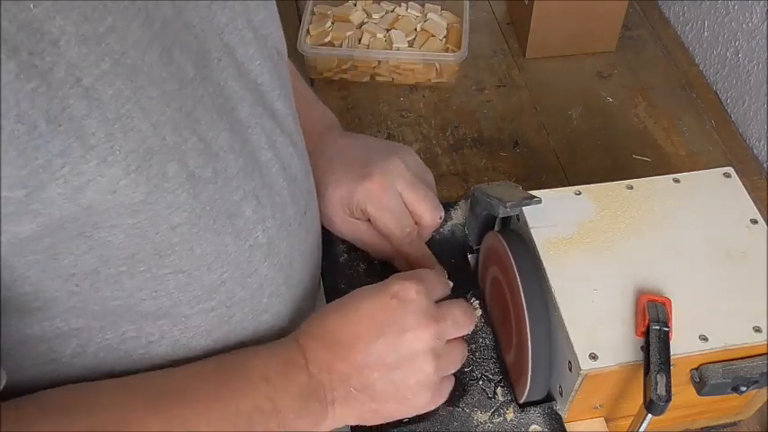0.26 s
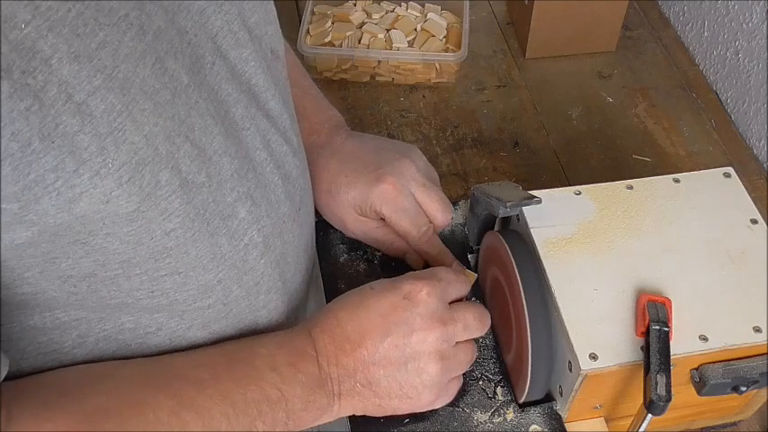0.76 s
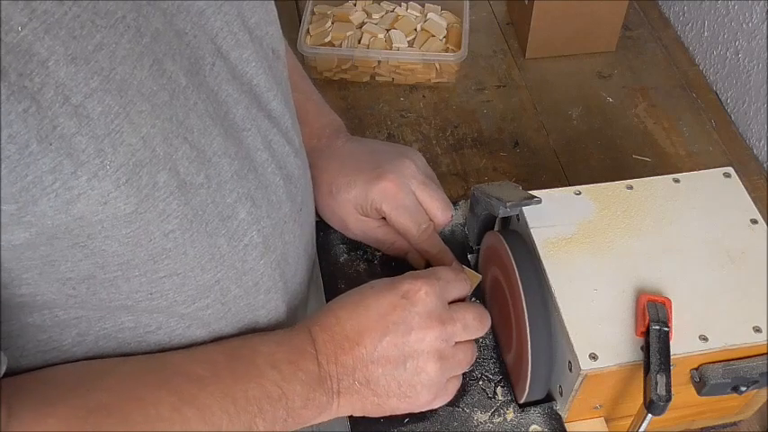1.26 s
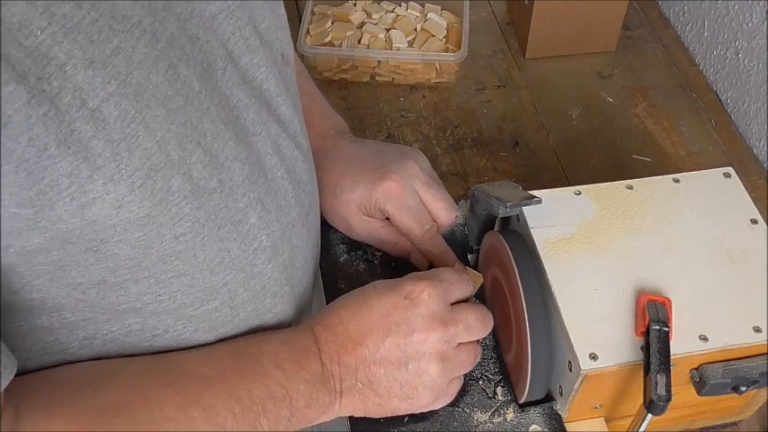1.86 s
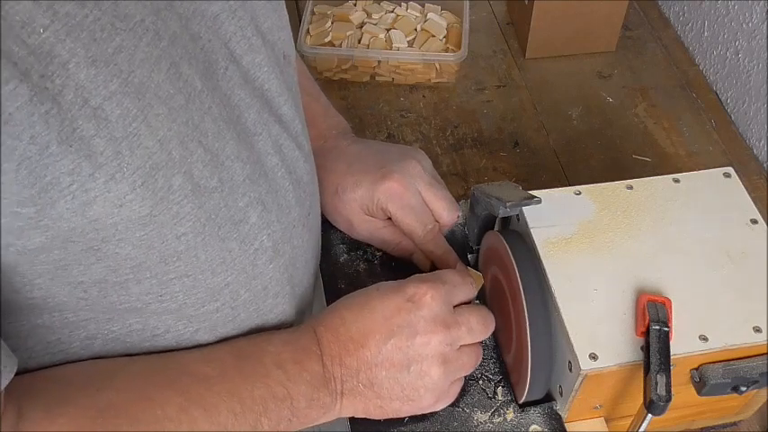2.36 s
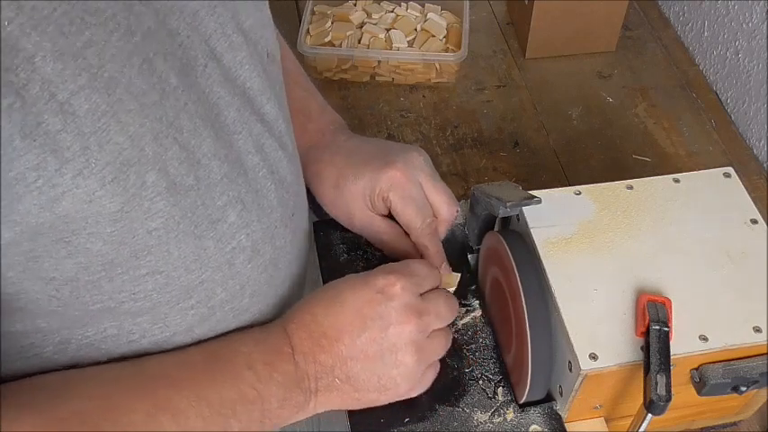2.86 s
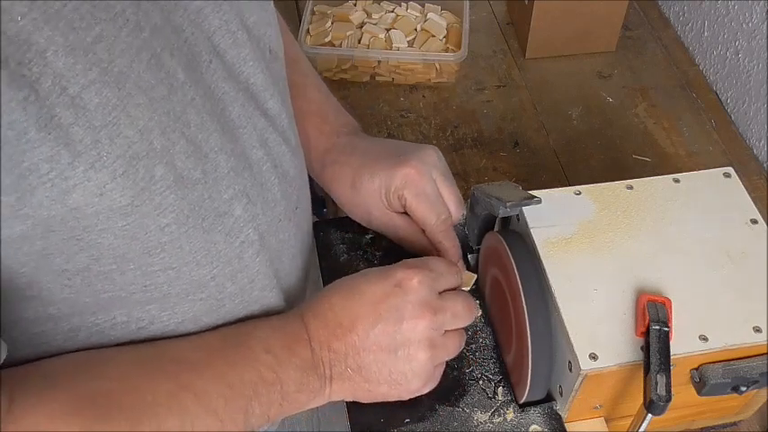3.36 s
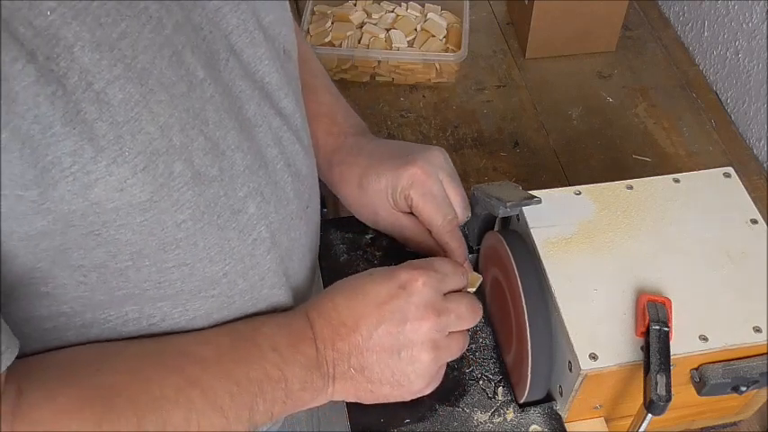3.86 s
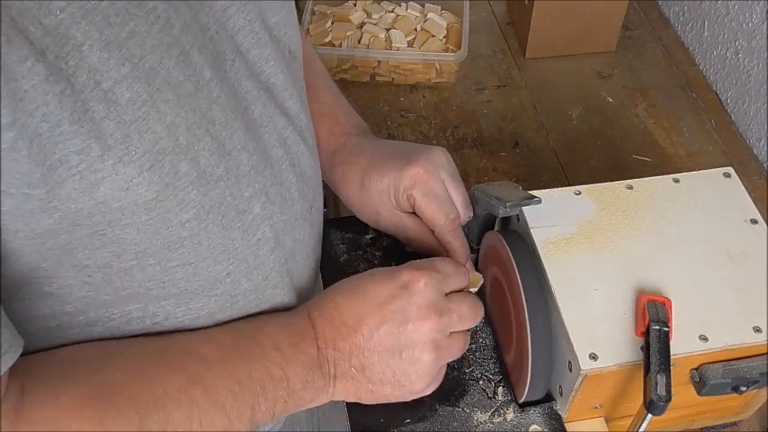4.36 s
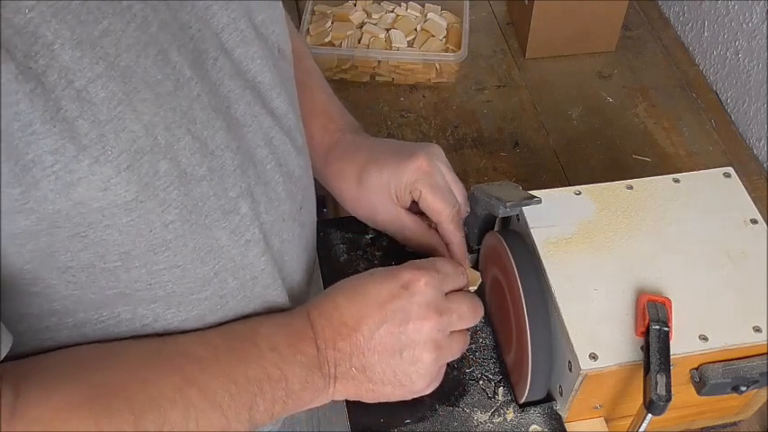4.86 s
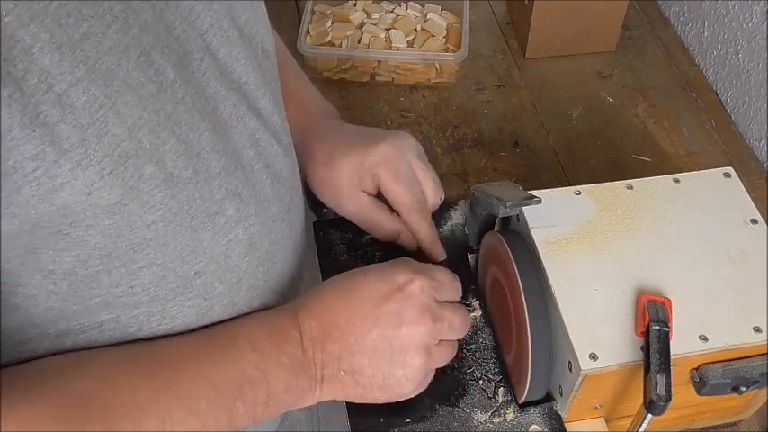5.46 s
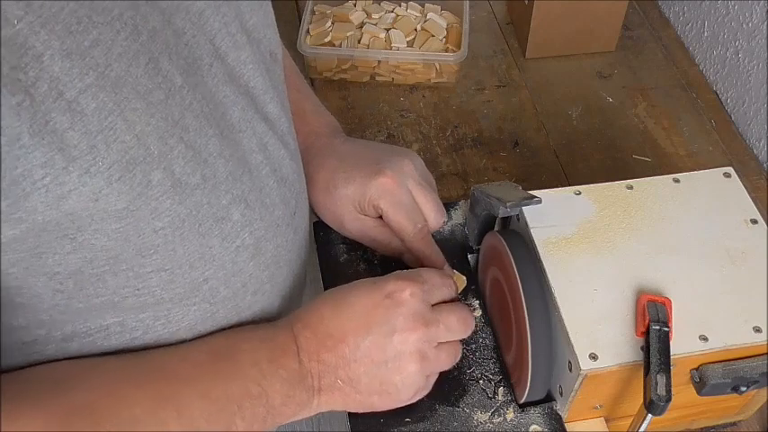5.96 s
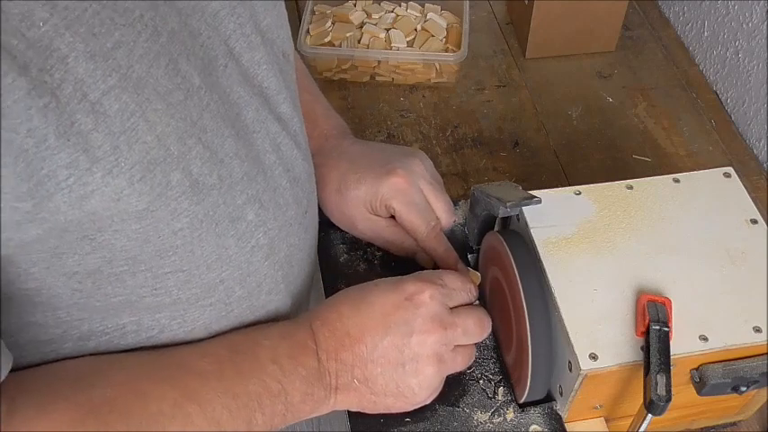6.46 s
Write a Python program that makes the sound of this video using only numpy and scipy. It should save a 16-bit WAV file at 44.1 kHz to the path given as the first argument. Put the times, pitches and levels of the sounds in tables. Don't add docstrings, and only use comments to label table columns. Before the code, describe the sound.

A small disc sander drones steadily on a bench while two small wooden pieces are pressed on in turn, each giving a harsh buzzing rasp.

```python
import sys
import numpy as np
from scipy import signal
from scipy.fft import rfft, irfft, next_fast_len
from scipy.io import wavfile
from scipy.ndimage import uniform_filter1d

SR = 44100
rng = np.random.default_rng(int(sys.argv[2]) if len(sys.argv) > 2 else 0)


def dump_mix(stems):
    frames = np.atleast_2d(stems).T
    limited = np.clip(frames, -1, 1)
    pcm = np.round(limited * 32767).astype(np.int16)
    wavfile.write(sys.argv[1], SR, pcm)


def makeup_ratio(level_db):
    decades = np.asarray(level_db, float) / 20
    return 10 ** decades


N = 295470

BALLS_PER_TURN = 2.58
SETTLE_S = 0.083

# (touch [s], firm after [s], ease-off [s], lift [s])
PIECES = [
    (1.325, .13, 2.55, 2.672),
    (3.785, .09, 4.83, 4.98),
]
# (level after gain control [dB], top-band lift at the touch [dB],
# creep of that lift as the edge wears [dB], gain control depth [dB])
BITES = [
    (-31.5, 14, 4, -49.5),
    (-30.5, 6, -10, -50.5),
]


def evened(x):
    return x / np.sqrt(np.mean(x ** 2) + 1e-20)


def coloured(x, points):
    size = next_fast_len(x.shape[-1])
    hz, db = np.transpose(points)
    log_hz = np.log(np.fft.rfftfreq(size, 1 / SR) + 1)
    response = makeup_ratio(np.interp(log_hz, np.log(hz + 1), db))
    return irfft(rfft(x, size) * response, size)[..., :x.shape[-1]]


def drift(per_s):
    points = rng.standard_normal(400)
    return np.interp(np.arange(N) / SR * per_s, np.arange(400), points) * 1.156


def ring(hz, t60):
    t = np.arange(1500) / SR
    mode = makeup_ratio(-60 * t / t60) * np.sin(2 * np.pi * hz * t)
    return mode / np.linalg.norm(mode)


def resonate(x, hz, width):
    spin = np.exp(2j * np.pi * np.cumsum(hz * np.ones(N)) / SR)
    r = np.exp(-np.pi * width / SR)
    return 2 * (spin * signal.lfilter([1 - r], [1, -r], x / spin)).real


def stages(piece, values):
    touch, firm, ease, lift = PIECES[piece]
    catch = touch + 0.54 * firm
    times = [touch, catch, touch + firm, touch + firm + SETTLE_S, ease, (ease + lift) / 2, lift]
    return np.interp(np.arange(N) / SR, times, values)


def disc_speed():
    free_turns_per_s, spin_up_s, let_go_s = 58.72, .4523, .2956
    # (start [s], at first [turns per s2], at the hardest [turns per s2], free again [s])
    braking = [
        (1.33, 2.055, 29.38, 2.6957),
        (3.79, 5.3525, 27.905, 5.094),
    ]
    t = np.arange(N) / SR
    drag = np.zeros(N)
    for start, first, top, end in braking:
        drag += np.interp(t, [start, end - let_go_s, end], [first, top, 0], left=0)
    return free_turns_per_s - signal.lfilter([1 / SR], [1, -np.exp(-1 / (SR * spin_up_s))], drag)


def room(x, t60=0.33, apart_hz=3500):
    taps = np.zeros((3, 9000))
    at = np.arange(60, 8980, 20) + rng.integers(0, 20, (3, 446))
    np.put_along_axis(taps, at, rng.choice([-1., 1.], at.shape), 1)
    taps *= makeup_ratio(-60 * np.arange(9000) / SR / t60)
    low = signal.butter(1, apart_hz, fs=SR, output="sos")
    taps = taps[:2] + signal.sosfilt(low, taps[2] - 0.46 * taps[:2])
    return signal.oaconvolve(x, taps / np.linalg.norm(taps[0]), axes=1)[:, :N]


def panels():
    out = np.zeros(N)
    for hz, db in [(265, -45), (430, -46), (503, -46), (600, -51)]:
        band = signal.butter(1, [hz - 6, hz + 6], "band", fs=SR, output="sos")
        out += makeup_ratio(db) * evened(signal.sosfilt(band, rng.standard_normal(N)))
    return out


def strain(speed):
    colour = [(30, -30), (70, -12), (110, -19), (160, 11), (220, 2), (400, -47)]
    grumble = coloured(rng.standard_normal(N), colour)
    return makeup_ratio(-65.0) * (speed.max() - speed) * evened(grumble)


def drone(turn):
    # (frequency [Hz], level [dB per Hz])
    box_colour = [(40, -38), (90, -24), (200, -17), (270, -4), (420, -10), (600, 0.5), (750, -9.5),
                  (980, -9), (1200, -13), (1400, -22.5), (1700, -40), (2300, -16.5), (3000, -101),
                  (6000, -80)]
    ball_knocks, angle = np.zeros(N), np.arange(257) / 256
    for balls in range(1, 16):
        sides = rng.standard_normal((13, 2)) @ [1, 1j]
        pattern = sides @ np.exp(2j * np.pi * np.arange(-6, 7)[:, None] * angle)
        strength = np.interp(turn % 1, angle, pattern)
        ball_knocks += (strength * np.exp(2j * np.pi * balls * BALLS_PER_TURN * turn)).real
    ball_knocks = evened(coloured(ball_knocks, box_colour))
    common, apart = rng.standard_normal(N), rng.standard_normal((2, N))
    rumble = evened(coloured(common + 0.79 * apart, box_colour))
    return makeup_ratio(-34.0) * ball_knocks + makeup_ratio(-33.0) * rumble * makeup_ratio(0.87 * drift(60.0))


def box_db(hz):
    # (frequency [Hz], width [Hz], lift [dB])
    modes = [(362, 14, 7), (505, 16, 14), (607, 16, 11), (993, 16, 6)]
    return sum(db / (1 + (2 * (hz - f) / width) ** 2) for f, width, db in modes)


def tones(speed, turn):
    # (multiple of the ball rate [-], multiple of
    # the turn [-], level [dB])
    tone_mixes = [(0, 1, -39), (0, 2, -42), (0, 3, -50), (1, 0, -48), (1, 2, -49), (2, 0, -46), (0, 6, -42),
                  (2, 1, -37), (1, 4, -48), (0, 7, -47), (2, 2, -46), (4, -3, -44), (3, 0, -48), (0, 8, -45),
                  (2, 3, -47), (1, 6, -46), (3, 1, -40), (0, 9, -45), (2, 4, -46), (0, 10, -46), (2, 5, -41),
                  (4, 0, -40), (4, 1, -46), (4, 3, -47), (6, 0, -46), (6, 1, -46), (5, 4, -44), (5, 6, -49),
                  (7, 3, -51), (0, 20, -50),
                  (0, 26, -61), (0, 30, -63), (0, 31, -60), (0, 32, -63), (0, 33, -66), (0, 35, -66)]
    out, coarse = np.zeros((2, N)), np.arange(0, N, 200)
    sag = speed.max() - speed[coarse]
    for balls, turns, db in tone_mixes:
        order = balls * BALLS_PER_TURN + turns
        lift_db = box_db(order * speed[coarse]) - box_db(order * speed.max())
        lift_db -= (1.1 if order > 3 else .3) * sag
        waver_db = 1.85 * drift(9.0)[coarse] * (order > 2)
        size = np.interp(np.arange(N), coarse, makeup_ratio(db + 4.0 + lift_db + waver_db))
        wave = size * np.exp(2j * np.pi * (order * turn + rng.random()))
        skew = (0.022 + 0.017 * order) * (rng.standard_normal(2) @ [1, 1j])
        skew = -.12 + .05j if order < 3 else skew
        out += (np.array([[1 + skew], [1 - skew]]) * wave).real
    return out


def ticks(turn):
    # (frequency [Hz], t60 [s], level [dB])
    housing = [(2348, 0.031, -43), (5360, 0.0034, -45.5), (7990, 0.0022, -42.5), (9470, 0.0036, -51),
               (10650, 0.00062, -48.5)]
    # (frequency [Hz], level [dB per Hz])
    whirr = [(880, -14), (1500, -6.5), (1980, -25), (2340, -3), (2820, -13), (4260, -11.5), (5390, -10),
             (6560, -13), (8070, -13.5), (13100, -27), (15800, -35)]
    passes = np.diff(np.floor(turn * BALLS_PER_TURN), prepend=0) > 0
    stray = rng.random(N) < 250.0 / SR
    uneven = makeup_ratio(3.9 * np.minimum(rng.exponential(1, N), 2.5))
    force = (passes + 0.61 * stray) * uneven
    scuff = signal.oaconvolve(force, makeup_ratio(-60 * np.arange(400) / SR / 0.01))[:N]
    out = np.zeros((2, N))
    for hz, t60, db in housing:
        common, apart = rng.standard_normal(N), rng.standard_normal((2, N))
        drive = scuff * (common + hz / 9100.0 * apart)
        out += makeup_ratio(db) * evened(signal.oaconvolve(drive, ring(hz, t60)[None], axes=1)[:, :N])
    air = rng.standard_normal(N) + 0.35 * rng.standard_normal((2, N))
    struck = coloured(out, [(11000, 0), (13000, -2.5), (16000, -13)])
    return struck + makeup_ratio(-42) * evened(coloured(air, whirr))


def knocks():
    # (time [s], peak [dB], share of low knock [dB])
    hits = [
        (0.0572, -9, -7.5),
        (0.286, -17, -25),
        (1.29, -26, 2),
        (3.2064, -44, -16),
        (5.7182, -17.5, -16),
        (5.948, -13.5, -24),
        (6.4165, -13, -10),
    ]
    snap, low_knock, t = np.zeros(N + 900), np.zeros(N + 900), np.arange(900) / SR
    for s, db, low_db in hits:
        tick = makeup_ratio(db - 2 - 60 * t / 0.012) * rng.standard_normal(900)
        snap[round(s * SR):][:900] += tick
        low_knock[round(s * SR):][:900] += tick * makeup_ratio(low_db)
    bright = coloured(snap[:N], [(3500, -23), (6000, -3.5), (10000, -6.5), (16000, -36)])
    return bright + coloured(low_knock[:N], [(600, -20), (1500, 8), (4000, 2.5), (7000, -25)])


def chatter(turn):
    # (multiple of the turn [-], first piece after gain control [dB], second piece [dB])
    multiples = [(14.16, -61.5, -67), (15.9, -63, -77), (17.06, -66.5, -77), (18.33, -63, -64),
                 (21.04, -61, -75), (23, -67, -70), (26, -57, -55), (26.8, -52.5, -55), (27.95, -52, -64),
                 (40, -57, -56), (54.3, -55, -71), (30.25, -54.5, -75)]
    out, t = np.zeros(N), np.arange(N) / SR
    for piece, ((start, *_, end), wear_db) in enumerate(zip(PIECES, [-8, -14])):
        held = np.interp(t, [start + 0.055, start + 0.18, end - .1, end], [0, 1, makeup_ratio(wear_db), 0])
        for order, *db in multiples:
            level = makeup_ratio(db[piece] + 0.5 + 4 * drift(7))
            out += held * level * np.cos(2 * np.pi * (order * turn + rng.random()))
    return out


def grit(turn, count=1000):
    laps, kept, slip = int(turn[-1]) + 3, .945, 3.
    size = makeup_ratio(3.5 * np.minimum(rng.exponential(1, (laps, count)), 3.5))
    fresh = rng.standard_normal((laps, count)) * size
    grains = signal.lfilter([1], [1, -kept], fresh, axis=0)
    ridges = uniform_filter1d(uniform_filter1d(rng.standard_normal((laps, count)), 25, 1), 18, 1)
    ridges = evened(signal.lfilter([1], [1, -kept], ridges, axis=0))
    surface = (grains * makeup_ratio(1.5 * ridges)).ravel()
    return evened(np.interp(turn * count + slip * drift(10), np.arange(surface.size), surface))


def pressure(piece, angle):
    arc_turns = [0.064, 0.137, 0.39, 0.43, 0.51, 0.32, .04]
    middle_turns = [0.011, 0.062, 0.05, -0.048, -0.022, -.01, 0.026]
    edge_catch = [1.9, 2.1, 2.1, 1.9, .4, .4, .4]
    high_spot = [1, 1, 1.2, 1.5, 4, 4, 4]
    middle, arc = stages(piece, middle_turns), np.maximum(stages(piece, arc_turns), .01)
    first, last = middle - arc / 2, middle + arc / 2
    touch = np.clip((angle - first) / 0.011, 0, 1) * np.clip((last - angle) / 0.041 + .5, 0, 1)
    press = 1.7 + np.sin(np.pi * np.clip((angle - first) / (last - first), 0, 1))
    press += stages(piece, high_spot) * np.exp(-abs(angle + .015) / .045)
    edge = stages(piece, edge_catch) * np.exp(-abs(angle - first) / 0.036)
    trail = 0.39 * np.exp(-((angle - last) % 1) / 0.047)
    return (touch * (press + edge) + trail + 0.07) / np.sqrt(last - first)


def sanding(turn):
    # (frequency [Hz], level [dB per Hz])
    colours = [
        [(900, -38), (1500, -14.5), (2400, -20.5), (3300, -12.5), (4000, -11), (4900, -10), (5700, -9),
         (7600, -1), (9000, -6), (11100, -11.5), (12500, -20), (15800, -27)],
        [(900, -38.5), (1500, -26.5), (2400, -24.5), (3000, -28.5), (3500, -16), (4600, -12), (5600, -15.5),
         (7000, -6.5), (8200, -5), (10000, -9), (14500, -16.5), (15800, -23)],
    ]
    # (frequency [Hz], level [dB per Hz])
    rub_colour = [(300, -42), (1000, -28.5), (1600, -18), (2600, -22), (4000, -16), (8000, -14.5),
                  (12000, -25.5), (16000, -40)]
    # (shift [s], from [Hz], to [Hz], strength [dB], table ring after it [dB])
    grips = [
        (2.22, 4340, 4800, 9, 7),
        (4.35, 3500, 4660, -1, 11),
    ]
    stage_db = [-3.5, 1.5, 0.5, -.5, -2, -7.5, -26]
    top_share = [1, 1, -0.54, 0.1, 0.99, -.5, -1]
    shift_s, table_touch_db = 0.07, -29
    common = grit(turn + .5)
    apart = coloured(grit(turn + .5), [(1000, 0), (5000, -31), (9000, -3.0), (15000, -4.0)])
    grains, loose = np.array([common + apart, common - apart]), rng.standard_normal((3, N))
    rub = coloured(0.5 * common + 0.5 * loose[0] + 0.46 * loose[1:], rub_colour)
    angle, t, out = (turn + .5) % 1 - .5, np.arange(N) / SR, np.zeros((2, N))
    for piece, colour in enumerate(colours):
        start, *_, end = PIECES[piece]
        db, lift_db, creep_db, _ = BITES[piece]
        shift, from_hz, to_hz, wood_db, late_db = grips[piece]
        level_db = db + stages(piece, stage_db)
        top_db = lift_db * stages(piece, top_share) + creep_db * np.interp(t, [start, end], [-.5, .5])
        wood_hz = np.interp(t, [shift - shift_s, shift + shift_s], [from_hz, to_hz])
        table_db = np.interp(t, [start, shift + shift_s], [table_touch_db, late_db])
        held = (t > start) & (t < end)
        bite = coloured(grains * pressure(piece, angle), colour)
        wood = makeup_ratio(wood_db) * resonate(bite, wood_hz, 470)
        bite += wood + makeup_ratio(table_db + 5.5) * resonate(bite + wood * 0, 2720, 38)
        top = coloured(bite, [(8000, -44), (11000, -13)])
        bite += top * (makeup_ratio(top_db) - 1)
        out += (bite / bite[:, held].std() + makeup_ratio(10.5) * rub) * makeup_ratio(level_db) * held
    return out


def gain():
    open_db, overshoot_db, reopen_db, knee_db = -27, -2, -45.5, 0.5
    early_share, reopen_s, recover_db_per_s = 0.64, 0.053, 17
    t, db = np.arange(N) / SR, open_db
    for (touch, firm, ease, lift), (*_, depth_db) in zip(PIECES, BITES):
        firm_at, reopen_at = touch + firm, lift + reopen_s
        times = [touch - .02, touch + early_share * firm, firm_at, firm_at + SETTLE_S, ease, reopen_at]
        levels = [open_db, (open_db + depth_db) / 2, depth_db + overshoot_db, depth_db, depth_db, reopen_db]
        fall = np.interp(t, times, levels)
        under = open_db - reopen_db - recover_db_per_s * (t - lift - reopen_s)
        climb = open_db - knee_db * np.logaddexp(0, under / knee_db)
        db = np.minimum(db, np.where(t < reopen_at, fall, climb))
    return makeup_ratio(db + 26.5)


def scene():
    start_turn = .715
    speed = disc_speed()
    turn = start_turn + np.cumsum(speed) / SR
    near = (sanding(turn) + chatter(turn) + knocks()) / gain() + ticks(turn)
    machine = tones(speed, turn) + drone(turn) + panels() + strain(speed)
    return near + makeup_ratio(-7.0) * room(near) + machine


def top_cut(x):
    return signal.sosfilt(signal.butter(12, 15910, fs=SR, output="sos"), x)


def record(dry):
    # (frequency [Hz], level [dB])
    port_colour = [(300, 0), (550, -1), (1100, -2), (2200, -1), (4500, 0), (8500, .3), (13000, 0.5)]
    ports = []
    for heard, side in zip(dry, [1, -1]):
        ports.append(coloured(heard, [(hz, side * db / 2) for hz, db in port_colour]))
    ducked = np.array(ports) * gain() + makeup_ratio(-92) * rng.standard_normal(dry.shape)
    edge = signal.firwin(601, 15780, window=("kaiser", 9), fs=SR)[None]
    return top_cut(signal.oaconvolve(ducked, edge, "same", axes=1))


dry = scene()
out = record(dry)
dump_mix(out)
```